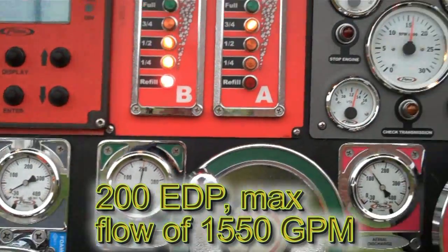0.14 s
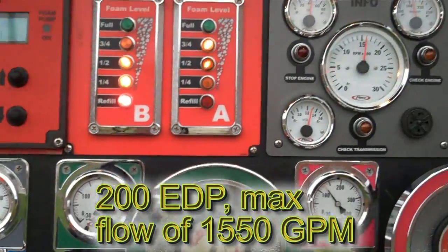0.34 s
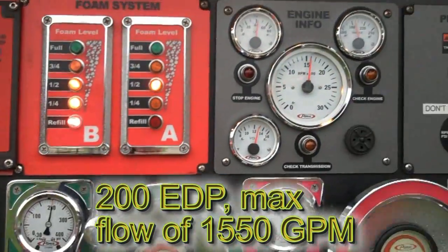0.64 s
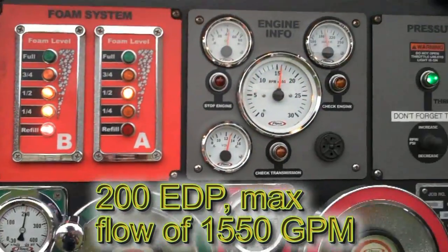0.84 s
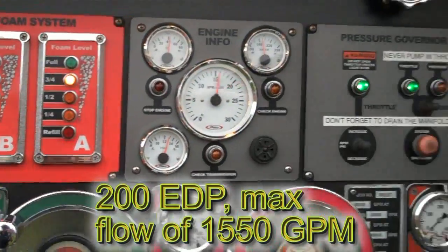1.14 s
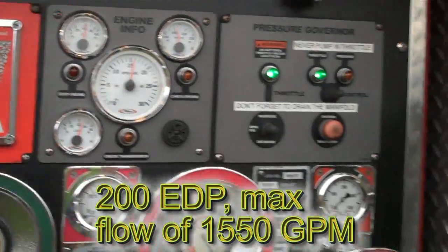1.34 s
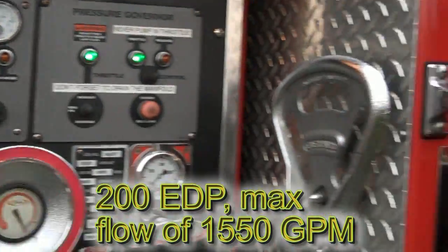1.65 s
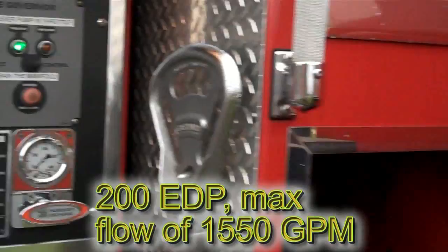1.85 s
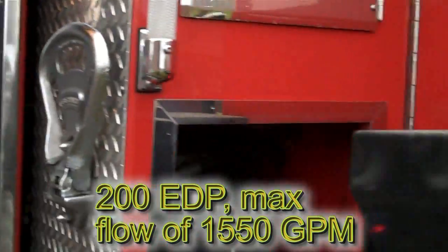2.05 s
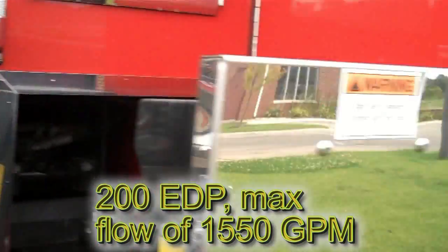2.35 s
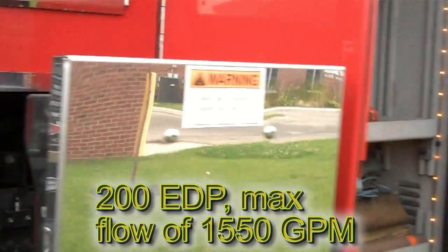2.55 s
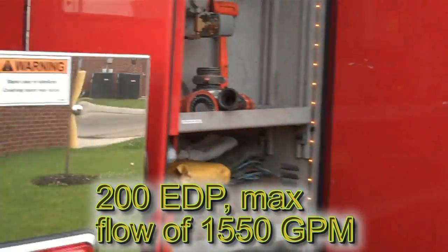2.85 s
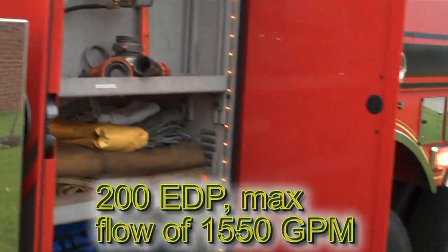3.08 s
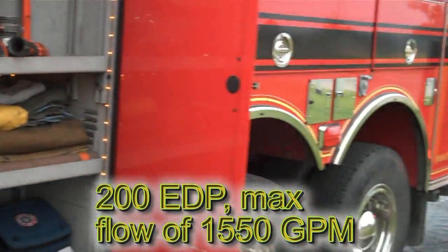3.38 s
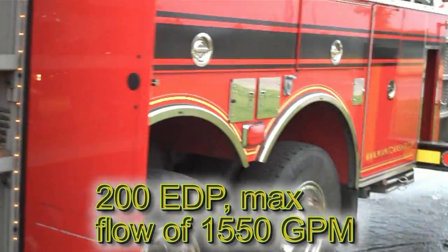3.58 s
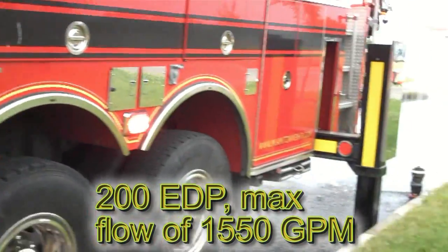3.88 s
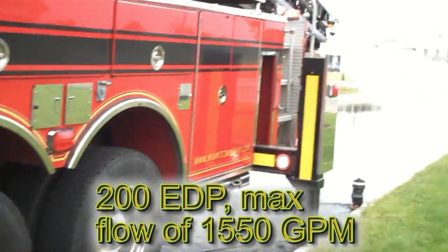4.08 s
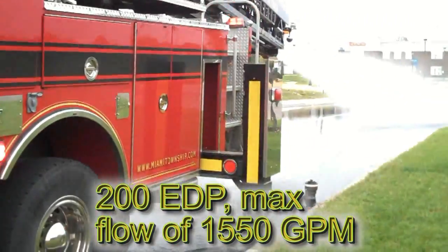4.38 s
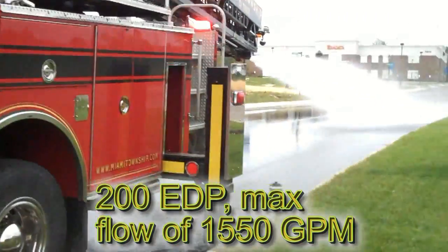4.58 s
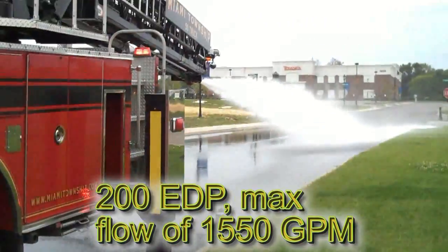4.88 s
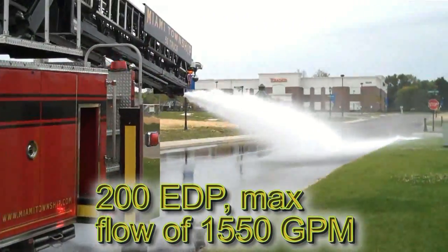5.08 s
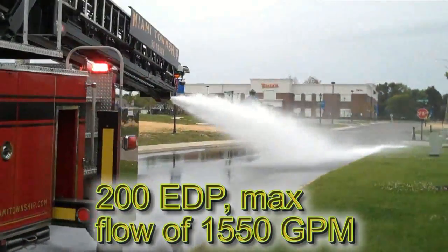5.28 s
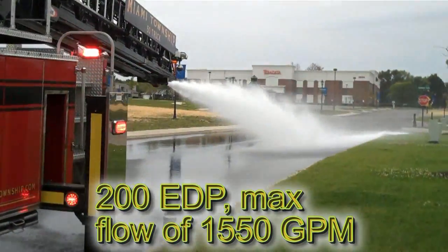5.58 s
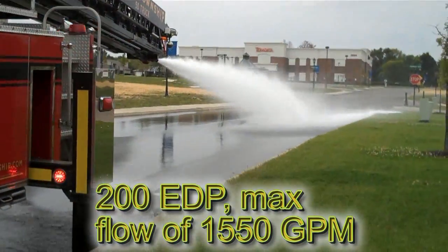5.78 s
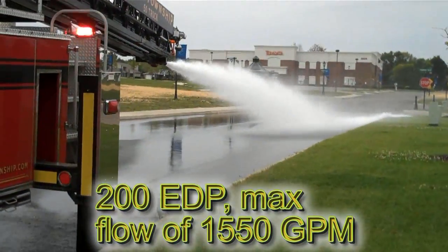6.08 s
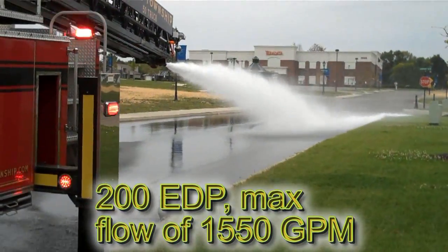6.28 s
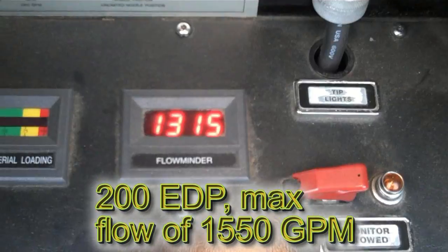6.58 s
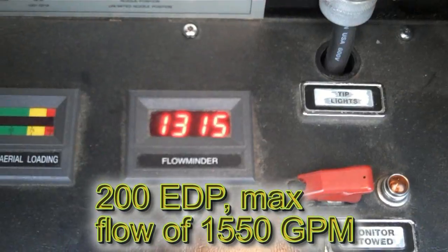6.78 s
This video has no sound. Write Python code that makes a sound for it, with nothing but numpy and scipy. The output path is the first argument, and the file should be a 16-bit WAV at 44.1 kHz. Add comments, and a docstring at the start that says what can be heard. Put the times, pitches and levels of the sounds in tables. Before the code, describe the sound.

A large diesel fire pump runs at steady high throttle outdoors, roaring under a loud, wavering gear whine, then switches abruptly to a boomier position.

```python
"""Diesel fire pump outdoors

A six-cylinder diesel drives a fire pump at steady high throttle. The listener, with one microphone, turns from
the pump panel towards the tail of the truck and its water jet; then a cut to a place up on the deck. A 41-tooth
gear whines in sine harmonics that swell and fade. Sines locked to the crank make the firing hum, gears and
impeller; filtered noise makes the ringing pipe and bodywork, engine roar, spray hiss and a buffet of air; clicks
make a tick."""
import sys
import numpy as np
from scipy import signal
from scipy.io import wavfile

SR = 44100
rng = np.random.default_rng(int(sys.argv[2]) if len(sys.argv) > 2 else 0)


def attenuation_scalar(level_db):
    """Turn a level in dB into a linear amplitude multiplier (20 dB per decade)."""
    decades = np.asarray(level_db, float) / 20
    return 10 ** decades


def master(y):
    """Save y as 16-bit WAV."""
    cut = np.clip(np.atleast_2d(y).T, -1, 1)
    pcm = np.round(cut * 32767)  # scale
    wavfile.write(sys.argv[1], SR, pcm.astype(np.int16))


N = 305613  # samples
TIME = np.arange(N) / SR  # seconds


def rms_one(x):
    """Scale to unit rms."""
    return x / np.sqrt(np.mean(x ** 2) + 1e-20)


def in_time(*tables):
    """Draw curves through rows of (s, values), one value a sample for each column."""
    s, *columns = np.transpose(np.vstack(tables))
    return [np.interp(TIME, s, column) for column in columns]


# Where the microphone is: times in seconds at the panel, flank, tail, last moment at the tail, first on the deck.
PLACES_S = (1.0, 3.0, 5.0, 6.495, 6.505)


def by_place(panel, flank, tail, deck):
    """A value that glides between standpoints on the ground and switches at the cut to the deck."""
    return np.interp(TIME, PLACES_S, [panel, flank, tail, tail, deck])


def at_hz(points, hz):
    """Read a spectrum on a log-frequency axis."""
    points_hz, points_db = np.transpose(points)
    return np.interp(np.log(hz), np.log(points_hz), points_db)


def drift(corner_hz):
    """Slow chance of unit rms: coarse noise through two equal one-pole low-passes."""
    step = 40  # samples between coarse values
    r = np.exp(-2 * np.pi * corner_hz * step / SR)
    noise = rng.standard_normal(N // step + 2002)
    slow = signal.lfilter([1], [1, -2 * r, r * r], noise)[2000:]  # the filter has settled
    return np.interp(np.arange(N) / step, np.arange(len(slow)), rms_one(slow))


def band(x, low_hz, high_hz):
    """Butterworth band-pass."""
    return signal.sosfilt(signal.butter(2, [low_hz, high_hz], "band", fs=SR, output="sos"), x)


def tone(cycles, level_db):
    """A sine of the given rms level, from a random phase."""
    return np.sqrt(2) * attenuation_scalar(level_db) * np.sin(2 * np.pi * (cycles + rng.random()))


def swells(rows, rest_db):
    """Level in dB: half-cosine lobes add in power over a wavering rest; none crosses the cut."""
    s = np.arange(0, N, 40) / SR
    waver_db = 3.0 * drift(14)
    power = attenuation_scalar(2 * (rest_db + waver_db))[::40]
    for peak, length, db in rows:
        lobe = np.cos(np.pi * np.clip((s - peak) / length, -.5, .5)) ** 2
        same_side = (s < PLACES_S[-1]) == (peak < PLACES_S[-2])
        power = power + attenuation_scalar(2 * db) * lobe * same_side
    return np.interp(TIME, s, 10 * np.log10(power))


# Crank speed. Each row: time in seconds, speed in turns per minute.
CRANK_SPEED = [(0, 1619.7), (1, 1619), (1.45, 1617.7), (1.95, 1620.5), (2.3, 1617), (3.1, 1614.3),
               (3.8, 1613.3), (4.2, 1616), (5.3, 1617), (5.8, 1615.3), (6.495, 1617), (6.505, 1612.8),
               (6.93, 1612.3)]


def crank():
    """Turns of the crank so far, the sum of its speed."""
    (rpm,) = in_time(CRANK_SPEED)
    return np.cumsum(rpm / 60) / SR


# Gear harmonics swell as the moving listener crosses their direct and reflected waves. One list per harmonic,
# each row: peak in seconds, length in seconds, level in dB added in power to the rest.
WHINE_SWELLS = [
    [(0.13, 0.23, -30.0), (0.29, 0.23, -24.7), (0.56, 0.43, -24), (1.05, 0.93, -25), (1.28, 0.5, -21.8),
     (1.84, 0.63, -20.6), (2.29, 0.36, -29), (2.41, 0.13, -28.8), (2.7, 0.57, -27.7), (2.86, 0.2, -24.5),
     (3.11, 0.2, -36.0), (3.58, 0.41, -31), (3.62, 0.85, -37.5), (3.93, 0.22, -29.9), (4.57, 1.28, -29.7),
     (4.99, 0.15, -30), (5.29, 0.25, -42), (5.62, 0.6, -27.5), (6.45, 0.31, -26), (6.49, 1.73, -29.5),
     (6.57, 0.28, -34)],
    [(0.1, 0.79, -35), (0.87, 0.9, -37), (1.41, 0.18, -33), (1.69, 0.63, -34.1), (2.05, 0.15, -33.5),
     (2.59, 0.34, -34), (2.82, 0.18, -33), (2.99, 3.8, -44), (3.11, 0.42, -36.5), (3.45, 0.15, -39),
     (3.9, 0.11, -50), (4.53, 0.12, -45), (5.08, 0.82, -45.5), (5.19, 0.1, -41.0), (5.8, 0.26, -38.5),
     (6.49, 1.7, -40.7), (6.78, 0.84, -38.5)],
    [(0.11, 0.44, -33), (0.41, 0.31, -33), (1.29, 4.1, -33.5), (2.12, 0.47, -32), (3.37, 0.83, -33.0),
     (5.07, 0.37, -35.2), (5.53, 0.23, -30.5), (6.24, 4.14, -30)],
    [(0.78, 1.8, -32), (1.87, 0.34, -37.5), (2.23, 0.24, -35.6), (2.51, 0.21, -36), (2.99, 0.74, -32),
     (3.39, 0.54, -35.3), (3.86, 0.5, -39), (4.73, 1.12, -32), (5.39, 0.48, -40.8), (6.41, 1.05, -37.4),
     (6.5, 1.6, -42.5)],
    [(0.53, 1.3, -34.5), (1.37, 0.37, -36.5), (1.99, 0.21, -38.7), (2.33, 1.7, -46), (3.38, 0.39, -45),
     (4.08, 0.22, -42), (4.16, 0.9, -42), (4.74, 0.48, -43.5), (5.54, 0.64, -40), (6.37, 0.38, -39.5)],
    [(0.17, 0.16, -40.1), (0.41, 0.17, -34), (1.1, 0.33, -42), (1.1, 1.8, -44), (1.75, 0.18, -42),
     (2.72, 0.22, -45), (3.29, 4.0, -49), (3.4, 0.18, -41), (3.87, 0.71, -38.5), (4.56, 0.16, -44),
     (5.02, 0.2, -44), (5.52, 0.3, -38), (6.07, 0.29, -39.2), (6.49, 3.6, -42.5), (6.64, 0.15, -44),
     (6.83, 0.21, -34.7)],
    [(0.29, 1.12, -60), (1.01, 0.28, -52), (1.66, 0.39, -47), (2.82, 0.27, -45.0), (3.25, 2.61, -51.4),
     (3.39, 0.15, -39), (3.87, 0.15, -47), (4.54, 0.16, -42.5), (4.91, 0.55, -52.8), (5.84, 0.15, -52),
     (6.15, 1.6, -54)],
]
# Which harmonic of the tooth mesh each list belongs to.
WHINE_HARMONICS = (3, 5, 1, 2, 4, 6, 9)
# Level about which each harmonic wavers between swells. Each row: dB on the ground, dB on the deck.
WHINE_REST = [(-39.5, -52), (-52, -46), (-44.5, -49), (-50, -47), (-50.5, -46.5), (-49.5, -51),
              (-55.5, -56)]


def gear(turns):
    """Run-out of the wheel wobbles the mesh of 41 teeth once a turn; higher harmonics flutter more."""
    runout = 0.0043 * np.sin(2 * np.pi * turns)
    mesh = 41 * turns + runout + 0.013 * drift(5.8) + 0.0063 * drift(43)  # cycles
    throb = 1 + 0.017 * np.cos(2 * np.pi * turns)
    whine = 0
    for k, rows, (ground, deck) in zip(WHINE_HARMONICS, WHINE_SWELLS, WHINE_REST):
        level_db = swells(rows, by_place(ground, ground, ground, deck))
        flutter_db = k * (0.33 * drift(36) + 0.17 * drift(5.4))
        whine = whine + tone(k * mesh, level_db + flutter_db)
    return throb * whine


# Steady tones in cycles per crank turn: firing orders, then gears and the turbocharger.
ORDERS_PER_TURN = (3, 4.5, 6, 7.5, 9, 17.27, 22.22, 43.9, 48.1, 54, 57, 79, 84, 119, 121, 124, 125, 127,
                   130.3, 203, 207, 221, 287, 328, 338, 410, 451)
# Level about which each tone wavers. Each row: dB rms at the panel, flank, tail, deck.
ORDER_LEVELS = [(-54, -53, -58, -44.5), (-47, -46, -51, -56), (-41, -45.5, -46.5, -49),
                (-51, -46, -56, -42), (-37, -46.5, -57, -41.5), (-38, -45, -45.5, -66),
                (-45, -50, -48, -60), (-64, -47, -47, -43), (-71, -62, -57, -59), (-69, -62, -45, -61),
                (-41, -46.5, -43.5, -60), (-50, -41.5, -43, -53), (-47, -66, -50, -59),
                (-52, -52, -49, -52), (-75, -44, -63, -63), (-44.5, -45, -44, -56), (-57, -63, -56, -45.5),
                (-50, -52, -48, -53), (-58, -51, -62, -56), (-60, -53.5, -48.5, -64), (-44, -48, -56, -67),
                (-57, -55, -69, -69), (-54, -62, -58, -70), (-52.5, -67, -66, -69), (-60, -70, -55, -62),
                (-61.5, -68, -70, -74), (-66, -71, -73, -72)]


def orders(turns):
    """Tones locked to the crank, each wavering in level; the high ones blur in pitch."""
    total = 0
    for per_turn, places_db in zip(ORDERS_PER_TURN, ORDER_LEVELS):
        cycles = per_turn * (turns + 0.00091 * drift(29))
        total = total + tone(cycles, by_place(*places_db) + 2.26 * drift(6.9))
    return total


# Swells of the impeller blade tone. Each row: peak in seconds, length in seconds, level in dB added in power.
IMPELLER_SWELLS = [(0.07, 0.17, -28.5), (0.68, 4.0, -32.5), (2.89, 2.9, -32.5), (3.95, 0.26, -33.9),
                   (4.42, 0.47, -35.5), (4.85, 0.13, -36.3), (5.25, 1.45, -43), (6.85, 0.13, -35)]


def impeller(turns):
    """Blades passing the casing tongue, geared up from the crank: 10.77 a crank turn."""
    level_db = swells(IMPELLER_SWELLS, rest_db=-47.5)
    return tone(10.77 * turns + 0.017 * drift(12), level_db + 0.86 * drift(6.8))


# Resonances of exhaust pipe and bodywork. Each row: centre in Hz, width in Hz, level in dB at the panel, flank,
# tail and deck, the last before the surges.
RESONANCES = [(201.7, 30, -45.5, -38.5, -45, -47.5), (216.2, 18.7, -75, -45, -40.5, -35.5),
              (241.9, 39, -32, -38, -44, -36.5), (393, 67, -41, -36.5, -47, -52),
              (449.7, 59, -60, -36, -47, -52), (3283, 270, -56, -58, -50, -36)]
# On the deck the boom sinks between surges. Each row: peak in seconds, length in seconds, gain in dB added in power.
DECK_SURGES = [(6.56, 0.042, 1), (6.755, 0.077, 2), (6.84, 0.075, 2.5)]


def boom():
    """Turbulence ringing in the pipe and the panels, between steep edges."""
    ringing = 0
    for hz, width, *places_db in RESONANCES:
        low, high = hz - width / 2, hz + width / 2
        noise = band(rng.standard_normal(N), low, high)
        noise = band(noise, low, high)  # twice for steepness
        ringing = ringing + attenuation_scalar(by_place(*places_db)) * rms_one(noise)
    surge_db = swells(DECK_SURGES, rest_db=-6)
    return ringing * attenuation_scalar(np.where(TIME < PLACES_S[-1], 0, surge_db))


# Colour of the roar at the panel. Each row: frequency in Hz, density in dB, read against its value at 600 Hz.
ROAR_PANEL = [(30, -51), (60, -20.5), (130, -18), (280, -5.5), (450, -4), (820, -6), (1210, -7.5),
              (1900, -14.5), (2240, -12.5), (2800, -17.5), (3900, -21), (5500, -23.5), (7000, -29),
              (9100, -57)]
# The same at the tail. Each row: frequency in Hz, density in dB, read against its value at 600 Hz.
ROAR_TAIL = [(30, -57), (60, -22.5), (130, -17.5), (218, -8), (450, -7), (960, -8), (1400, -8.5),
             (1910, -14.5), (2200, -13), (2800, -16), (3900, -20), (5500, -24), (7000, -24.5), (9100, -52)]
# The same up on the deck. Each row: frequency in Hz, density in dB, read against its value at 600 Hz.
ROAR_DECK = [(30, -30), (80, -22), (129, -7), (218, -6), (474, -7), (1150, -5.5), (1910, -12.5),
             (2600, -12.5), (3700, -12.5), (5200, -17), (7000, -24), (9100, -52)]


def roar(level_db, turns):
    """Third-octave noise bands; the colour follows the standpoint, cylinders of unequal strength pulse it."""
    white = rng.standard_normal((2, N))  # neighbouring bands take different noise
    edges = 28 * 2 ** np.arange(0, 8.1, 1 / 3)  # Hz
    total = 0
    for k, (low, high) in enumerate(zip(edges, edges[1:])):
        centre = np.sqrt(low * high)
        panel, tail, deck = (at_hz(s, centre) - at_hz(s, 600) for s in (ROAR_PANEL, ROAR_TAIL, ROAR_DECK))
        colour_db = by_place(panel, (panel + tail) / 2, tail, deck)
        total = total + attenuation_scalar(colour_db + 0.91 * drift(6.6)) * band(white[k % 2], low, high)
    # 1, 1.5 and 2 beats a crank turn
    beat = .06 * sum(np.cos(2 * np.pi * per_turn * turns) for per_turn in (1, 1.5, 2))
    return attenuation_scalar(level_db + 15) * (1 + beat) * total


# Colour of the hiss. Each row: frequency in Hz, relative gain in dB.
HISS_COLOUR = [(5500, -8), (6550, -18.5), (8170, -10.5), (9200, -7), (10000, -8.5), (11000, -14.5),
               (11600, -19), (12300, -16), (12700, -6.5), (13100, -6), (13700, -19), (14300, -3)]


def hiss(level_db, turns):
    """Spray and cooling air: bright noise, each band in patches of its own, pulsing once a crank turn."""
    white = rng.standard_normal((2, N))  # neighbouring bands take different noise
    edges = 6300 * 2 ** np.arange(0, 1.25, 1 / 14)  # Hz
    together_db = 0.53 * drift(5.5)
    total = 0
    for k, (low, high) in enumerate(zip(edges, edges[1:])):
        colour_db = at_hz(HISS_COLOUR, np.sqrt(low * high)) + together_db + 1.1 * drift(14)
        total = total + attenuation_scalar(colour_db) * band(white[k % 2], low, high)
    pulse = 1 + .07 * np.cos(2 * np.pi * turns)
    return attenuation_scalar(level_db + 1) * pulse * rms_one(total)


# Broad noise at the microphone as the listener turns away and moves, then on the deck. Each row: time in seconds,
# relative level of the engine roar in dB, relative level of the spray and fan hiss in dB.
WASH_LEVELS = [(0.0, -26, -44), (1.63, -27.8, -45), (2.2, -30.5, -46), (2.6, -29.5, -43),
               (3.67, -30.5, -45.5), (5.4, -31, -44.5), (6.5, -30, -42.5), (6.505, -32.5, -43),
               (6.93, -33, -41.5)]


def wash(turns):
    """Engine roar and spray hiss, each following its own level curve."""
    roar_db, hiss_db = in_time(WASH_LEVELS)
    return roar(roar_db, turns) + hiss(hiss_db, turns)


def tick():
    """A faint low tick recurs: evenly spaced clicks of random size and sign, band-passed."""
    first_s, every_s = .008, .4797
    at = (np.arange(first_s, N / SR, every_s) * SR).astype(int)
    clicks = np.full(N, 1e-18)
    clicks[at] = attenuation_scalar(rng.normal(0, 2.5, len(at))) * rng.choice([-1, 1], len(at))
    return attenuation_scalar(-66) * rms_one(band(clicks, 18, 110))


# Buffet of air on the microphone at the cut to the deck. Each row: time in seconds, level in dB.
AIR_BUFFET = [(6.49, -50), (6.515, -29), (6.68, -60)]


def buffet():
    """Lumpy low noise, practically silent outside its moment."""
    before = [(AIR_BUFFET[0][0] - .005, -100)]
    after = [(AIR_BUFFET[-1][0] + .03, -100)]
    (level_db,) = in_time(before, AIR_BUFFET, after)
    return attenuation_scalar(level_db) * rms_one(band(rng.standard_normal(N), 22, 95))


# The level dips briefly at the cut to the deck. Each row: time in seconds, gain in dB.
CUT_DIP = [(6.515, 0), (6.521, -9), (6.523, -9), (6.529, 0)]


def cut_dip():
    """Gain of the brief dip in level at the cut."""
    (gain_db,) = in_time(CUT_DIP)
    return attenuation_scalar(gain_db)


def scene():
    """All sources as the one microphone meets them; the dip spares the buffet and the tick."""
    turns = crank()
    machine = gear(turns) + orders(turns) + impeller(turns) + boom()
    mix = (machine + wash(turns)) * cut_dip() + tick() + buffet()
    return mix[None]  # one channel


def roll_off(x):
    """The treble ends steeply here."""
    return signal.sosfilt(signal.butter(12, 15060, fs=SR, output="sos"), x)


def record(dry):
    """A steep elliptic low-pass takes off the top above 13780 Hz."""
    low_passed = signal.sosfilt(signal.ellip(10, .5, 50, 13780, fs=SR, output="sos"), dry)
    return roll_off(low_passed)


dry = scene()
out = record(dry)
master(out)
```